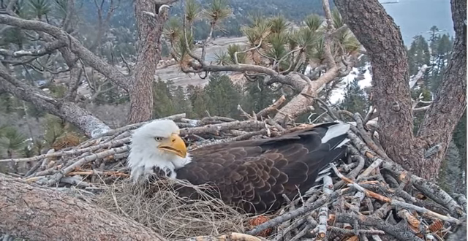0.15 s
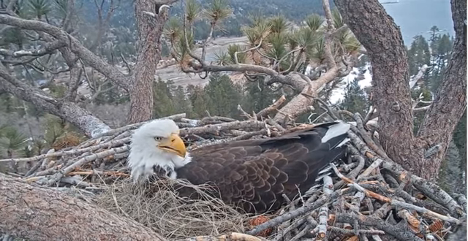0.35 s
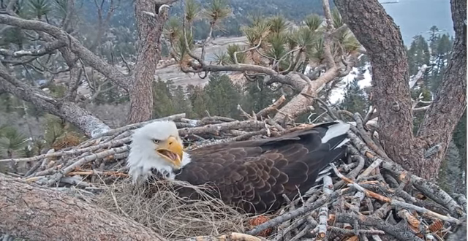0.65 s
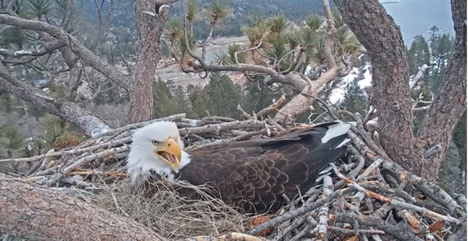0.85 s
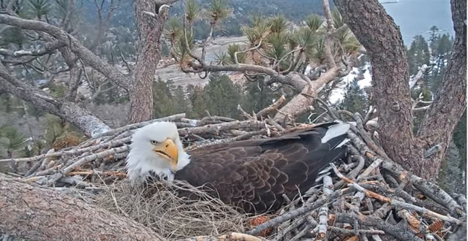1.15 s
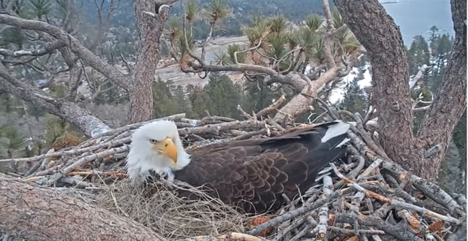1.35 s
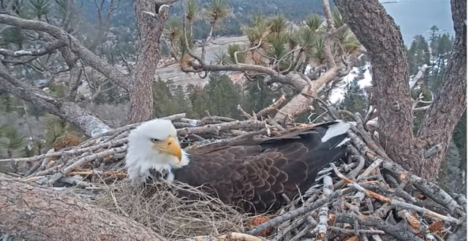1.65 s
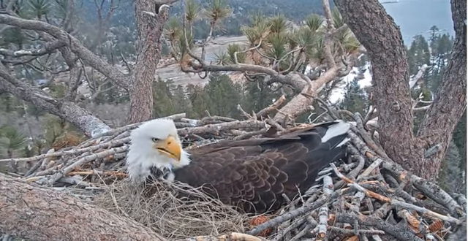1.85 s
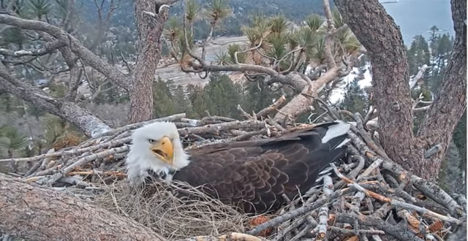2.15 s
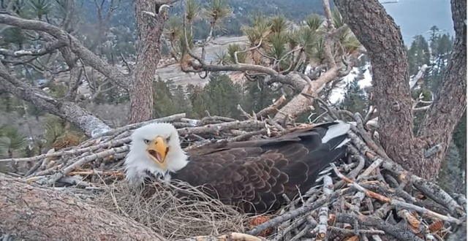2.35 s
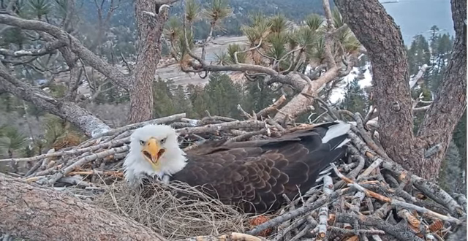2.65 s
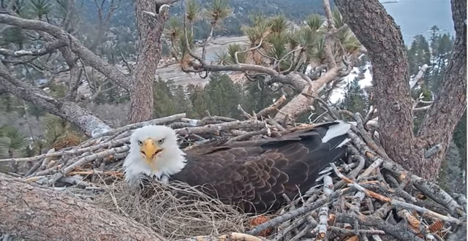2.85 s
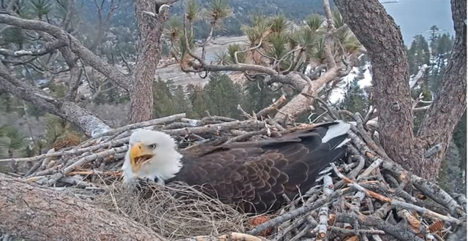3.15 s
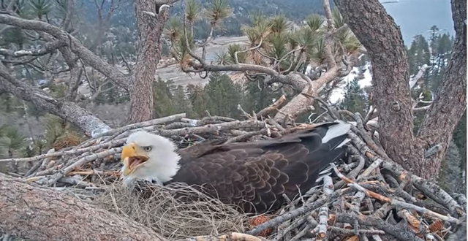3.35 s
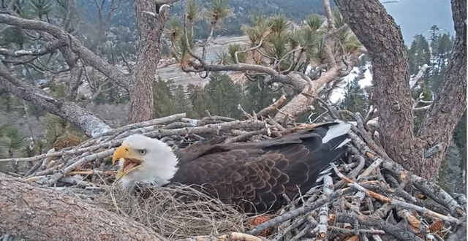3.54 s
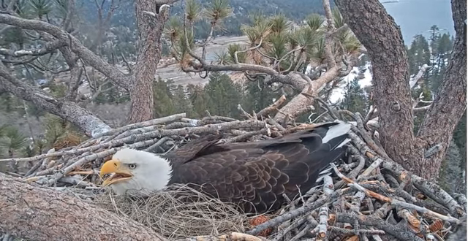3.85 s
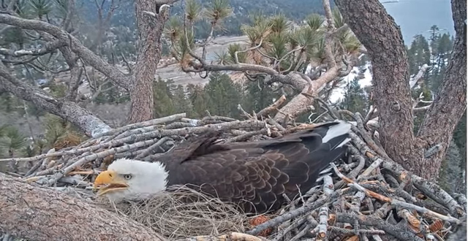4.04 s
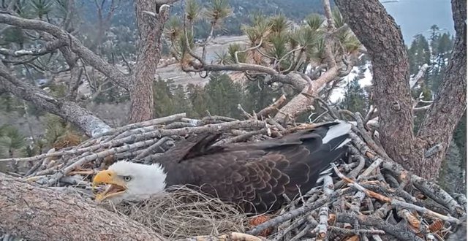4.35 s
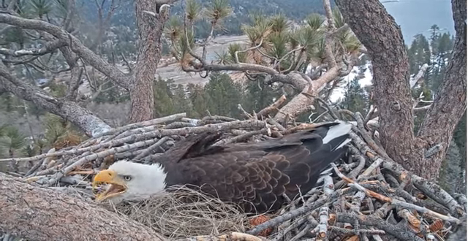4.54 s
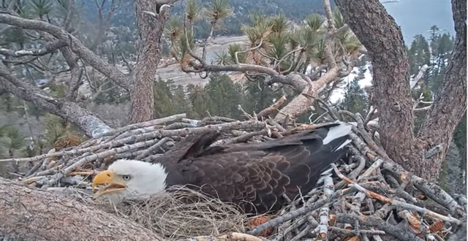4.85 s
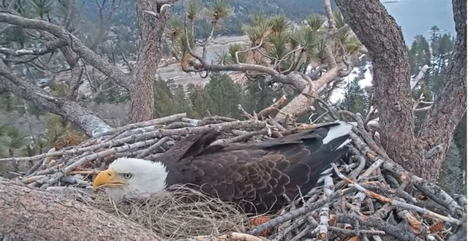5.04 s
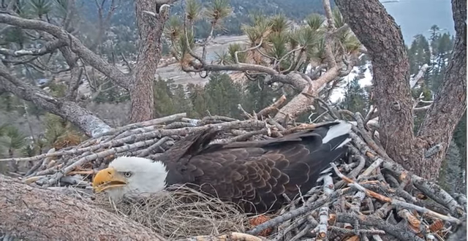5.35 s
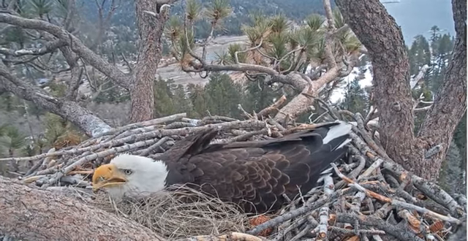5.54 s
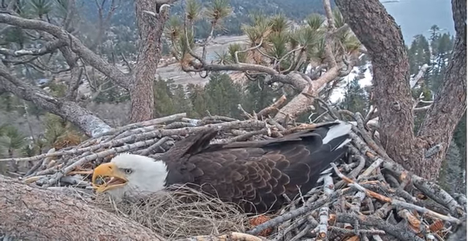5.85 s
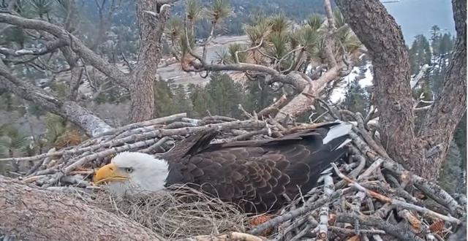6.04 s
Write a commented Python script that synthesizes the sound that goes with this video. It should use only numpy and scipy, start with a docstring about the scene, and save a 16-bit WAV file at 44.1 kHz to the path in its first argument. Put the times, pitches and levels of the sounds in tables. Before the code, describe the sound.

A close, dry, single-channel outdoor sound with a constant soft hiss, strongest around 3 kHz, sinking slightly in each cry and swelling back between. At 0 s an eagle's thin, nearly pure whistle near 3.5 kHz flips down at about 0.13 s into a short low-register yelp. Five long piping cries follow, at about 0.64-1.2, 2.07-2.9, 3.34-3.95, 4.34-5.05 and 5.58-6.3 s. Each dips, rises around 1.1-1.3 kHz, swells brighter and harsher, then drops steeply. The tone slips between clear, doubled and raspy, with strong shrill overtones. Faint twig ticks come at 1.4-1.7 s, another at 2.4 s. The fourth cry starts with a quaver and rough buzz; from 4.6 to 5.1 s sharp twig snaps, woody knocks, a dull thud and dry rustling overlap it. The last cry begins softer and clearer.

```python
"""A bald eagle calls from its stick nest, over a steady hiss that sinks a little during each cry.
First comes a thin, whistled squeal that flips down, then five long, rising, piping cries.
The syrinx (the bird's voice box) slips between clean tone, period doubling and rasp, built from sines and
noise, and the pitch drops as each cry ends. A few twigs click, mostly in the pause after the first long cry;
later they snap, knock and rustle, made of short and swelling noise, as the bird leans forward."""
import sys
import numpy as np
from scipy import signal
from scipy.fft import rfft, irfft, next_fast_len
from scipy.io import wavfile
from scipy.ndimage import uniform_filter1d, minimum_filter1d

SR = 44100
rng = np.random.default_rng(int(sys.argv[2]) if len(sys.argv) > 2 else 0)


def master(y):
    """Save y as 16-bit WAV."""
    cut = np.clip(np.atleast_2d(y).T, -1, 1)
    pcm = np.round(cut * 32767)  # scale
    wavfile.write(sys.argv[1], SR, pcm.astype(np.int16))


N = 271215
TIME = np.arange(N) / SR

# Colour of the background hiss: (frequency [Hz], relative level per Hz [dB])
HISS_COLOUR = [(15, -37.5), (25, -34), (92, -22), (137, -16.5), (562, -10), (659, -9), (838, -9.5),
               (1180, -5.5), (1760, -6), (2130, -8.5), (3170, 3), (4850, -22.5), (6000, -19), (8480, -34),
               (14400, -38.5)]
# Path of the squeal until it flips into the first cry: (time [s], pitch [Hz], level [dB])
SQUEAL_PATH = [(0.0, 3470, -7), (0.032, 3574, -11.5), (0.046, 3517, -8), (0.11, 3624, -11.5),
               (0.128, 3565, -9.5), (0.146, 3650, -12.5)]
# Second and third harmonic of the squeal: level relative to its main tone [dB]
SQUEAL_OVERTONES_DB = [-33, -47]
# Faint low tones that build up before the flip: (frequency [Hz], relative level [dB])
SQUEAL_UNDERTONES = [(1270, -21.5), (1980, -18)]
# The cries; the first is only the fall that ends the squeal. Contour, then voice:
# (start [s], dip [s], release [s], opening pitch [Hz], dip pitch [Hz], top pitch [Hz], arch of the rise [-],
#  opening effort [0-1], final effort [0-1], middle of the swell [s], width of the swell [s],
#  level [dB], second harmonic [dB], third harmonic [dB], overtones [dB], rasp [dB], crouch [0-1])
CRIES = [ (0.128, 0.135, 0.145, 1270, 1264, 1264, 0, 0.67, 0.53, 0.14, 0.055, 2.5, -0.5, 5.5, 2, -26, 0),
         (0.638, 0.706, 1.169, 1208, 1179, 1265, .75, 0.17, 0.99, 0.91, 0.07, -1, 1, -0.5, 0, -28, 0.12),
         (2.071, 2.142, 2.867, 1180, 1139, 1262, .85, 0.18, 0.9, 2.562, 0.099, 0.5, 0.5, -1, 1.5, -30, 0),
         (3.34, 3.413, 3.921, 1239, 1194, 1277, .85, 0.46, 1, 4.135, 0.12, -0.5, 0, -3, 3.5, -30, 0),
         (4.338, 4.418, 5.024, 1108, 1105, 1208, -.42, 0.16, 0.84, 4.732, 0.14, -0.5, 1, 0.5, 0.5, -33, 1),
         (5.579, 5.7, 6.28, 1106, 1100, 1201, .62, 0, 0.78, 5.893, 0.2, 1, -3, 1, 0, -34.5, 0.8), ]
# Harmonics 1 to 5, head raised: (soft [dB], medium effort [dB], full effort [dB])
UPRIGHT = [(-18.5, -16.5, -18), (-22, -11.5, -5), (-16.5, -18.5, -18.5), (-50.5, -34, -19.5),
           (-28.5, -38, -25)]
# Harmonics 1 to 5, crouched with the neck stretched out: (soft [dB], medium effort [dB], full effort [dB])
CROUCHED = [(-23.5, -12, -28), (-11, -13, -10), (-40.5, -14.5, -16), (-51.5, -34, -23), (-51, -40.5, -17)]
# Strength of everything above the fifth harmonic: soft, medium and full effort [dB]
OVERTONE_DB = [-60.5, -38.5, -25]
# Colour of the overtones of a hard-blown cry: (frequency [Hz], relative level [dB])
OVERTONE_COLOUR = [(6500, 1.5), (7500, -5.5), (8100, -4.5), (8800, -5), (10000, -7.5), (11300, -10),
                   (12600, -9), (14500, -15.5)]
# The throat's colour on the lines between the harmonics: (frequency [Hz], relative level [dB])
THROAT_COLOUR = [(450, -27), (580, -17.5), (640, -18), (1500, -15), (1830, -2), (2400, -30), (2700, 3.5),
                 (3020, 8.5), (3170, 0.5), (3750, -10), (4300, -15), (5600, -22), (8000, -27.5),
                 (12000, -41)]
# Colour of the rasp: (frequency [Hz], relative level per Hz [dB])
RASP_COLOUR = [(30, -61.5), (100, -40), (250, -35.5), (700, -22.5), (1450, -16), (2050, -2.5), (2700, 1.5),
               (3200, 0.5), (3700, -9), (4300, -17), (6000, -21.5), (8000, -42.5), (14000, -62)]
# Colour of the air rushing through the open beak: (frequency [Hz], relative level per Hz [dB])
AIR_COLOUR = [(2000, 0.5), (4000, -29.5), (6200, -0.5), (7500, -1.5), (10000, 0.5), (14000, -34)]
# Stretches where the syrinx snaps into a pure tone: (start [s], end [s])
CLEAR = [(1.15, 1.1), (2.05, 2.212), (2.84, 2.92), (3.408, 3.41), (4.32, 4.415), (5.56, 5.79)]
# Stretches of period doubling: (start [s], end [s], opening level [dB], closing level [dB]), all relative
DOUBLING = [(0.652, 0.975, -19, -17.5), (0.968, 1.16, -25.5, -17.5), (2.2, 2.53, -18, -21.5),
            (2.522, 2.85, -21.5, -20.5), (3.35, 3.418, -20, -13), (3.432, 3.94, -16, -13.5),
            (4.76, 5.02, -27.5, -38), (5.92, 6.17, -40.5, -39)]
# Buzzing stretches, where the membranes lock in a five-cycle pattern:
# (start [s], end [s], opening level [dB], closing level [dB]), all relative
BUZZ = [(4.41, 4.545, -21.5, -19.5), (4.555, 4.615, -24, -19.5), (4.645, 4.735, -29, -30)]
# Twigs snapping and knocking, levels before each part's boost:
# (time [s], snap level [dB], thud level [dB], body level [dB])
TWIGS = [(1.4106, -31, -60, -58), (1.489, -34, -64, -62), (1.539, -55, -52, -45), (1.6677, -37, -61, -63),
         (2.42, -24, -44, -46), (4.5922, -9, -42, -24), (4.6076, -29, -50, -34), (4.7882, -15, -43, -33),
         (4.8095, 0, -27.5, -29), (4.8345, -7, -37, -17), (4.8583, -7, -26, -15), (4.873, -15, -42, -23.5),
         (4.971, -18, -30, -45), (5.0239, -23, -5.5, -14), (5.061, -34, -33.5, -49), (5.088, -23, -56, -45)]
# Colours of a twig's snap, thud and woody body: (frequency [Hz], relative level per Hz [dB])
SNAP_COLOUR = [(2000, -2.5), (5000, 7.5), (8500, -3), (12000, -8), (14500, -12)]
THUD_COLOUR = [(50, -30), (150, -12), (280, 14), (390, 5), (480, 11), (580, 21), (800, -4), (1500, -32),
               (4000, -55)]
BODY_COLOUR = [(400, -25.5), (1400, 5.5), (2200, 1), (3200, 12.5), (4200, -6), (7000, -35), (14000, -27)]
# The bird shoves against the nest lining: (start [s], length [s], level [dB])
SHOVES = [(4.248, 0.13, -39.5), (4.566, 0.067, -29.5), (4.788, 0.12, -24), (4.93, 0.076, -25.5),
          (5.013, 0.063, -27.5), (5.054, 0.16, -39.5)]
# Colour of the rustle: (frequency [Hz], relative level per Hz [dB])
RUSTLE_COLOUR = [(20, -50), (45, -35), (140, 2), (280, 2.5), (500, -2.5), (1000, -9.5), (3000, 6.5),
                 (5000, -8), (14000, -34)]

# Hiss: level, how far it sinks in a cry, and the pace of its return
HISS_DB, HISS_SINK_DB, HISS_RETURN_S = -33.5, 4, 0.55
# Each cry dips in pitch, climbs, then drops away as the breath is released
ATTACK_S, CROUCHED_ATTACK_S, RELEASE_S = 0.027, 0.014, 0.045
FALL_HZ_PER_S, FALL_ROUNDING_S = 6500, 0.00613
RELEASE_LOSS_DB, RELEASE_EFFORT_LOSS, RELEASE_DULLING_DB = 35.5, 0.34, 19
# A crouched cry quavers until it settles
QUAVER_HZ, QUAVER_PERIOD_S, QUAVER_LASTS_S = 10.2, 0.098, 0.18
# Chance in a harmonic's strength, per harmonic number: throughout, and extra in a crouched opening
WANDER_DB, FALTER_DB = 0.61, 1.0
# Change of the rasp from soft to full effort: slightly down when upright, up when crouched
RASP_CHANGE_DB, CROUCHED_RASP_CHANGE_DB = -1.5, 4
# A pure tone sits a little lower, with softer harmonics, weaker overtones and this level of rasp
CLEAR_SAG_HZ, CLEAR_GAIN_DB, CLEAR_DULLING_DB, CLEAR_RASP_DB = 10.37, -0.5, 2.5, -44
SWITCH_S = 0.0086  # time to slip from one way of vibrating into another
# The voice wavers between locked doubling and rasp: pace, swing of the rasp, swing of the doubling
TUG_PER_S, TUG_RASP_DB, TUG_DOUBLING_DB = 24, 2.1, 1.87
# The throat delays high partials: radians per squared harmonic number
HALF_LINE_LAG, SLAP_LAG = 0.76, 0.072
HALF_LINE_WAVER = 0.22
PUFF_DB = 2.2  # spread of the chance in the puffs of noise
EVENNESS = 0.56  # how far quick changes of the cry's loudness are evened out (0-1)
BEAK_CUT_HZ = 210
SHOVE_FADE_S = 0.013
CUTOFF_HZ, CEILING = 14400, 0.93  # top of the sound, and highest peak (full scale is 1)


def from_db(db):
    """Turn decibels into gain."""
    return 10 ** (np.asarray(db) / 20)


def rms_one(x):
    """Scale to unit power."""
    return x / np.sqrt(np.mean(x ** 2) + 1e-20)


def at_hz(points, hz):
    """Read a colour table on a log-frequency axis, as gain."""
    f, db = np.transpose(points)
    return from_db(np.interp(np.log(hz), np.log(f), db))


def at_effort(levels_db, effort):
    """Find a level between its soft, medium and full values."""
    return np.interp(effort, [0, 0.5, 1], levels_db)


def drift(rate, size):
    """Smooth chance of spread 1 that changes about rate times a second."""
    # made at an eighth of the sample rate; the first 1000 values let the filter settle
    r = np.exp(-16 * np.pi * abs(rate) / SR)
    raw = rng.standard_normal(size // 8 + 1002)
    slow = signal.lfilter([1], [1, -2 * r, r * r], raw)[1000:]
    return np.interp(np.arange(size) / 8, np.arange(len(slow)), rms_one(slow))


def noise(colour):
    """Noise of unit power with the given colour."""
    size = next_fast_len(N)
    hz = np.maximum(np.arange(size // 2 + 1) * SR / size, 1)
    spectrum = rfft(rng.standard_normal(size)) * at_hz(colour, hz)
    return rms_one(irfft(spectrum, size)[:N])


def gate(t, start, end, fade):
    """Open from start to end, with soft edges."""
    inside = np.minimum(t - start, end - t)
    return np.sin(np.pi / 2 * np.clip(inside / fade, 0, 1)) ** 2


def partial(phase, waver, rate):
    """A sine of unit power whose height and phase wander."""
    wander = 1 + waver * (drift(rate, len(phase)) + 1j * drift(rate, len(phase)))
    return np.real(wander * np.exp(1j * phase)) * np.sqrt(2 / (1 + 2 * waver ** 2))


def hiss():
    """Even background noise, strongest near 3 kHz; it sinks during each cry and slowly swells back."""
    sunk = np.zeros(N)
    for start, _, release, *_ in CRIES:
        end = release + RELEASE_S
        sinking = np.clip((TIME - start) / (end - start), 0, 1) ** 0.5
        returning = np.exp(-np.maximum(TIME - end, 0) / HISS_RETURN_S)
        sunk = np.maximum(sunk, sinking * returning)
    level_db = HISS_DB - HISS_SINK_DB * sunk + 0.5 * drift(17, N)
    return from_db(level_db) * noise(HISS_COLOUR)


def squeal():
    """The syrinx in its top register: almost a pure whistle, until the low register stirs."""
    s, path_hz, path_db = np.transpose(SQUEAL_PATH)
    pitch, level_db = np.interp(TIME, s, path_hz), np.interp(TIME, s, path_db)
    end = s[-1]
    phase = 2 * np.pi * np.cumsum(pitch * (1 + 0.0012 * drift(150, N))) / SR
    tone = partial(phase, waver=0.09, rate=150)
    for k, db in enumerate(SQUEAL_OVERTONES_DB):
        tone += from_db(db) * partial((k + 2) * phase, waver=0.72, rate=58)
    # rough noise and low tones build up towards the flip
    stirring = from_db(np.clip(150 * (TIME - end), -22, 0))
    tone += np.sqrt(stirring) * from_db(-21) * noise(RASP_COLOUR)
    for hz, db in SQUEAL_UNDERTONES:
        tone += stirring * from_db(db) * partial(2 * np.pi * hz * TIME, waver=1.0, rate=52)
    return from_db(level_db) * tone * gate(TIME, -1, end, fade=0.0092)


def cry_pitch(t, start, dip, release, opening_hz, dip_hz, top_hz, arch):
    """A short dip, a long arched climb, and a steep fall from the release on."""
    sinking = np.interp(t, [start, dip], [1, 0])
    climb = np.interp(t, [dip, release], [0, 1])
    rise_hz = (top_hz - dip_hz) * climb * (1 + arch * (1 - climb))
    fall_hz = FALL_HZ_PER_S * FALL_ROUNDING_S * np.logaddexp(0, (t - release) / FALL_ROUNDING_S)
    return dip_hz + (opening_hz - dip_hz) * sinking + rise_hz - fall_hz


def stretches(rows, t):
    """How far a way of vibrating is switched on (0-1), and its gain, at times t."""
    on, gain = 0, 0
    for start, end, opening_db, closing_db in rows:
        window = gate(t, start, end, SWITCH_S)
        on = on + window
        gain = gain + window * from_db(np.interp(t, [start, end], [opening_db, closing_db]))
    return on, gain


def half_lines(phase, pitch, doubling, unrest):
    """Period doubling: strong and weak cycles alternate, which adds lines half-way between harmonics."""
    out = np.zeros(len(phase))
    for k in np.arange(4) + 0.5:
        line = partial(k * phase - HALF_LINE_LAG * k ** 2, waver=HALF_LINE_WAVER * unrest, rate=74)
        out += doubling * from_db(-4.0) * at_hz(THROAT_COLOUR, k * pitch) * line
    return out


def low_harmonics(phase, harmonics_db, unrest):
    """The first three harmonics are rounded and steady; the second is shifted a quarter turn."""
    out = from_db(harmonics_db[0]) * partial(phase, waver=0.042 * unrest, rate=60)
    out += from_db(harmonics_db[1]) * partial(2 * phase + np.pi / 2, waver=0.12 * unrest, rate=150)
    out += from_db(harmonics_db[2] - 1.6) * partial(3 * phase, waver=0.2 * unrest, rate=110)
    return out


def sharp_slap(phase, pitch, harmonics_db, over_db, depth, unrest):
    """High harmonics form one sharp slap a cycle, waver more the higher they lie, and dull when soft."""
    slap = np.zeros(len(phase))
    dulling_db = np.minimum(0.87 * (over_db + 23), 0)  # per octave
    for k in np.arange(4, 12.5, 0.5):
        if k <= 5:
            height = from_db(harmonics_db[int(k) - 1])
        else:
            height = at_hz(OVERTONE_COLOUR, k * pitch) * from_db(over_db + dulling_db * np.log2(k / 6))
        # half-way lines take their share of the power as doubling deepens
        share = (1.2 * depth if k % 1 else 1) / np.sqrt(1 + 1.24 * depth ** 2)
        slap += height * share * partial(k * phase - SLAP_LAG * k ** 2, waver=0.045 * k * unrest, rate=130)
    return slap * from_db((1.1 + 0.44 * unrest) * drift(120, len(phase)) + 0.82)


def buzz_lines(phase, pitch, buzz):
    """A five-cycle pattern sets lines two fifths of the pitch either side of the harmonics."""
    out = np.zeros(len(phase))
    for k in np.arange(11):
        for line, side_db in ((k + 2 / 5, 0), (k + 3 / 5, -9)):
            tone = partial(line * phase, waver=0.47, rate=13)
            out += buzz * from_db(side_db) * at_hz(THROAT_COLOUR, line * pitch) * tone
    return out


def turbulence(phase, depth, over_db, rasp_db, rasp, air):
    """Rough breath noise pulses with each cycle; its airy part weakens on the weak cycles."""
    puffs = (1 + 0.087 * np.cos(phase)) * from_db(PUFF_DB * drift(78, len(phase)) - 1.5)
    jet = (1 + 0.97 * np.cos(phase)) * (1 + depth * np.cos(phase / 2))
    return puffs * (from_db(rasp_db + 7.0) * rasp + from_db(over_db - 9.0) * jet * air)


def syrinx(t, pitch, harmonics_db, over_db, rasp_db, rasp, air):
    """The voice: harmonics, lines between them where cycles differ, and pulsed noise."""
    _, doubling = stretches(DOUBLING, t)
    buzzing, buzz = stretches(BUZZ, t)
    clear = sum(gate(t, start, end, SWITCH_S) for start, end in CLEAR)
    tug = drift(TUG_PER_S, len(t))
    doubling = doubling * from_db(-TUG_DOUBLING_DB * tug)
    # the rasp is quieter under a buzz, and nearly gone in a pure tone
    rasp_db = rasp_db + TUG_RASP_DB * tug - 4 * buzzing
    rasp_db = rasp_db + clear * (CLEAR_RASP_DB - rasp_db)
    harmonics_db = [db + CLEAR_GAIN_DB * clear for db in harmonics_db]
    over_db = over_db - CLEAR_DULLING_DB * clear
    # the raspier the voice, the less even its cycles
    unrest = np.clip(from_db(rasp_db + 31.5), 0.25, 1.2)
    jitter = 0.0036 * unrest * drift(140, len(t)) + 0.0028 * drift(25, len(t))
    pitch = (pitch - CLEAR_SAG_HZ * clear) * (1 + jitter)
    phase = 2 * np.pi * np.cumsum(pitch) / SR
    depth = np.minimum(doubling / from_db(harmonics_db[1]), 1) ** 0.65  # of the doubling
    out = half_lines(phase, pitch, doubling, unrest)
    out += low_harmonics(phase, harmonics_db, unrest)
    out += sharp_slap(phase, pitch, harmonics_db, over_db, depth, unrest)
    if buzzing.any():
        out += buzz_lines(phase, pitch, buzz)
    return out + turbulence(phase, depth, over_db, rasp_db, rasp, air)


def evened(x):
    """Pull the loudness of each few milliseconds towards that of its surroundings."""
    quick, slow = (uniform_filter1d(uniform_filter1d(x ** 2, size=n), size=n) + 1e-9 for n in (120, 1800))
    return x * (slow / quick) ** (EVENNESS / 2)


def cry(row, rasp, air):
    """One cry: effort swells and brightens the voice, posture sets its colour, the release lets it die."""
    (start, dip, release, opening_hz, dip_hz, top_hz, arch, opening_effort, final_effort,
     swell_s, swell_width_s, level_db, second_db, third_db, overtones_db, rasp_db, crouch) = row
    now = (TIME >= start) & (TIME <= release + RELEASE_S)
    t = TIME[now]
    attack_s = np.interp(crouch, [0, 1], [ATTACK_S, CROUCHED_ATTACK_S])
    rasp_change_db = np.interp(crouch, [0, 1], [RASP_CHANGE_DB, CROUCHED_RASP_CHANGE_DB])
    unsettled = np.exp(-((t - start) / QUAVER_LASTS_S) ** 4)
    released = np.clip((t - release) / RELEASE_S, 0, 1) ** 2
    swell = (1 + np.tanh((t - swell_s) / (2 * swell_width_s))) / 2
    effort = opening_effort + (final_effort - opening_effort) * swell - RELEASE_EFFORT_LOSS * released

    colour = (1 - crouch) * np.array(UPRIGHT) + crouch * np.array(CROUCHED)
    wander_db = WANDER_DB + FALTER_DB * crouch * unsettled
    harmonics_db = []
    for k, own_db in enumerate((0, second_db, third_db, 0, 0)):
        chance_db = (k + 1) * wander_db * drift(15, len(t))
        harmonics_db.append(at_effort(colour[k], effort) + own_db + chance_db)
    over_db = at_effort(OVERTONE_DB, effort) + overtones_db - RELEASE_DULLING_DB * released
    rasp_db = rasp_db + rasp_change_db * (effort - 0.5)

    pitch = cry_pitch(t, start, dip, release, opening_hz, dip_hz, top_hz, arch)
    quaver = np.cos(2 * np.pi * (t - start) / QUAVER_PERIOD_S)
    pitch = pitch - QUAVER_HZ * crouch * unsettled * quaver
    voice = evened(syrinx(t, pitch, harmonics_db, over_db, rasp_db, rasp[now], air[now]))
    loudness = gate(t, start, np.inf, attack_s) * from_db(level_db - RELEASE_LOSS_DB * released)
    out = np.zeros(N)
    out[now] = voice * loudness
    return out


def cries():
    """The run of cries; the small beak radiates little bass."""
    rasp, air = noise(RASP_COLOUR), noise(AIR_COLOUR)
    out = sum(cry(row, rasp, air) for row in CRIES)
    return signal.sosfilt(signal.butter(1, BEAK_CUT_HZ, "high", fs=SR, output="sos"), out)


def bursts(times, levels_db, t60, rise):
    """An envelope that jumps at each time and dies away by 60 dB in t60 seconds."""
    out = np.zeros(N)
    for s, db in zip(times, levels_db):
        age = np.maximum(TIME - s, 0)
        out += from_db(db - 60 * np.minimum(age / t60, 2)) * (1 - np.exp(-age / rise))
    return out


def twigs():
    """Each twig gives a sharp snap, a woody crunch and a thud in the nest."""
    s, snap_db, thud_db, body_db = np.transpose(TWIGS)
    snap = bursts(s + 0.0011, snap_db + 0.5, t60=0.0089, rise=0.00041) * noise(SNAP_COLOUR)
    thud = bursts(s, thud_db + 6.5, t60=0.043, rise=0.00045) * noise(THUD_COLOUR)
    body = bursts(s, body_db + 21.0, t60=0.027, rise=0.0027) * noise(BODY_COLOUR)
    return snap + thud + body


def rustle():
    """Dry grass and sticks give way unevenly under the bird's breast: noise of flickering level."""
    pressure = sum(from_db(db) * gate(TIME, s, s + length, SHOVE_FADE_S) for s, length, db in SHOVES)
    uneven = from_db(2.5 * drift(80, N))
    return pressure * rms_one(uneven * noise(RUSTLE_COLOUR))


def scene():
    """The hiss, the bird and its nest added together in one channel, without echo."""
    return (hiss() + squeal() + cries() + twigs() + rustle())[None]


def record(dry):
    """The top is cut steeply, and a quick look-ahead limiter holds the peaks under the ceiling."""
    band = signal.sosfilt(signal.ellip(12, 0.1, 90, CUTOFF_HZ, fs=SR, output="sos"), dry)
    needed_gain = CEILING / np.maximum(np.abs(band), CEILING)
    held = minimum_filter1d(needed_gain, size=301)
    return band * uniform_filter1d(uniform_filter1d(held, size=151), size=151)


dry = scene()
out = record(dry)
master(out)
```